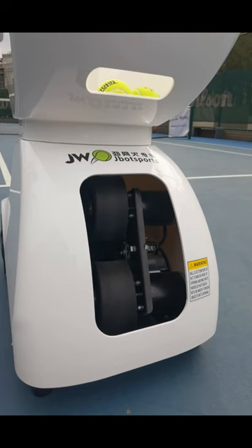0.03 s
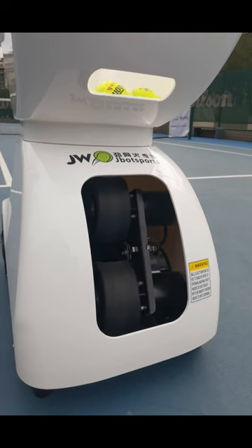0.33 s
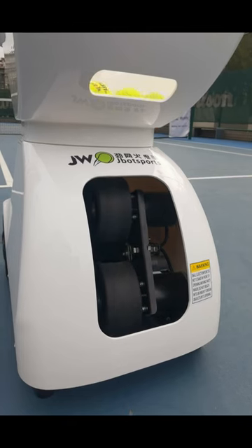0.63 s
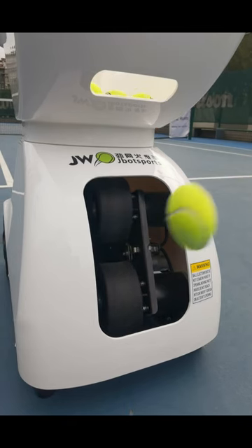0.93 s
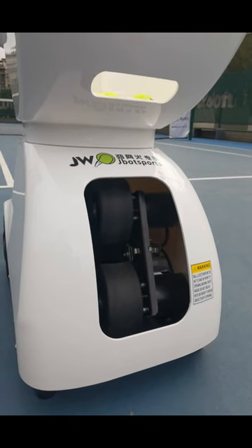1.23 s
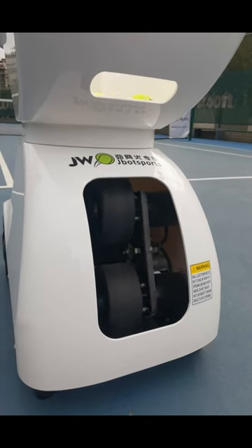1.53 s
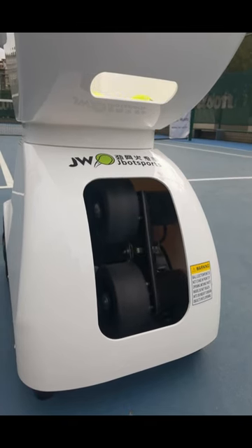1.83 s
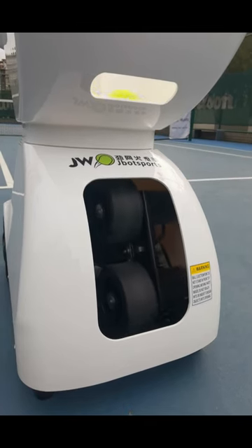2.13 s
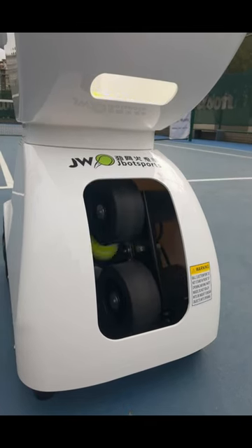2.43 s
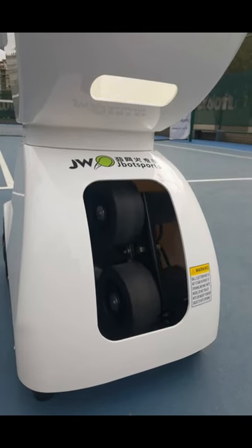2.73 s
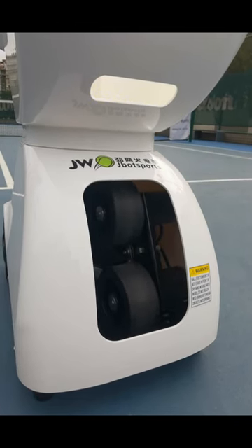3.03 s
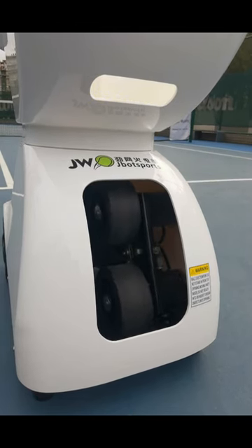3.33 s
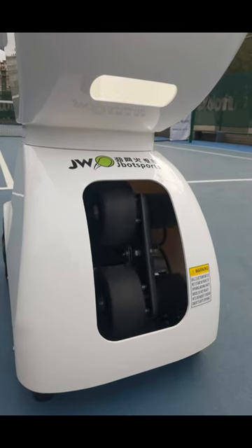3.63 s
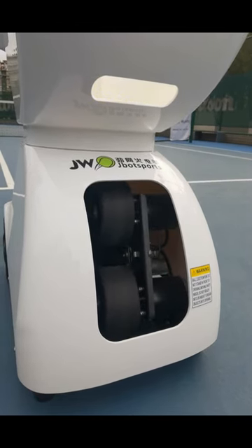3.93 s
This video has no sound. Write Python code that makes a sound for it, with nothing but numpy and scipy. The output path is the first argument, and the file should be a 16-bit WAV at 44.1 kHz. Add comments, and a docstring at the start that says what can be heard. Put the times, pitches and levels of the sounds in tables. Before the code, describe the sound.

A tennis ball machine's motor whines three times, each run ending with a clack.

```python
"""Tennis ball machine aiming

Outdoor court; the machine is close, a little to the right. A gear motor whines three times: already
running at first, then spinning up twice. Each time a coarser swivel drive joins in to turn the launch
head, and both stop with a clack. Twice a short rasp of the mechanism follows and runs down in a hum.
Hollow knocks sound in the plastic shell."""
import sys
import numpy as np
from scipy import signal
from scipy.fft import rfft, irfft, next_fast_len
from scipy.io import wavfile
from scipy.ndimage import map_coordinates

SR = 44100
rng = np.random.default_rng(int(sys.argv[2]) if len(sys.argv) > 2 else 0)


def unload_wav(signal):
    """Save mono or channel-first audio to the path in sys.argv[1] as 16-bit WAV at rate SR, clipped to [-1, 1]."""
    wavfile.write(
        sys.argv[1],
        SR,
        np.round(np.clip(np.atleast_2d(signal).T, -1, 1) * 32767).astype(np.int16),
    )


N = 176400

# Motor runs. Each row: start, end and rise in seconds, hiss in dB, sag in dB/s, opening whirr in dB,
# whine in Hz, whine in dB, whine fade in dB/s, reverse flag.
MOTOR_RUNS = [(0.037, .8, 0.01, -29, 19, -34.5, 1120, -36.5, 45, 0),
              (1.34, 2.356, 0.051, -33.5, 1, -38, 1117, -46.5, 3.5, 0),
              (2.933, 3.94, 0.06, -38, 2, -58, 1099, -54, 1, 1)]
# Each row: multiple of the whine, forward level in dB, reverse level in dB.
GEAR_LINES = [(1, -1.5, -1.5), (2, -2, -20), (2.385, -7.5, -6), (2.72, -30, -5), (3, -4, -14),
              (4, -13, -5.5), (5, -7.5, -18)]
# Each row: start and end in seconds, pitch in Hz, level in dB.
MOUNT_TONES = [(1.414, 1.513, 419.4, -47), (2.971, 3.147, 426, -49.5), (3.14, 3.331, 422.6, -54)]
# Each row: start in seconds, level in dB, T60 in seconds, pitch in Hz.
FRAME_THUDS = [(.047, -35.5, 0.085, 63.4), (0.439, -34, 0.21, 134.5), (0.511, -33, 0.27, 125.8),
               (.94, -28, 0.1, 90), (0.964, -29.5, 0.23, 70.3), (2.041, -35.5, 0.28, 129.8),
               (2.48, -26, 0.084, 122), (3.686, -34, 0.14, 105), (3.745, -28.5, 0.15, 74)]
# Each row: start and end in seconds, level in dB, sag in dB/s, hiss in dB, tooth rate in Hz.
SWIVEL_RUNS = [(0.176, 0.784, -27, 3, -37.5, 100.5), (1.761, 2.357, -32.5, 3.5, -41, 100.5),
               (3.336, 3.981, -33, -1, -42, 100.9)]
# Each row: start in seconds, level in dB, T60 in seconds.
GEAR_CATCHES = [(.349, -27, 0.097), (.44, -24.5, 0.027), (.702, -29.5, 0.069)]
SHELL_KNOCKS = [(.438, -18.5, 0.11), (.938, -32, 0.14), (2.036, -27, 0.25), (2.487, -25, 0.046),
                (3.686, -17, 0.088)]
FEEDER_TICKS = [(.593, -36, .09)]
STOP_CLACKS = [(.779, -17.5, 0.096), (.804, -26, 0.076), (2.348, -14, 0.08), (2.378, -27.5, 0.078),
               (3.686, -22, 0.043), (3.929, -13, 0.1), (3.987, -16, 0.096)]
# Each row: start and end in seconds, pitch in Hz, level in dB, T60 in seconds.
COASTS = [(0.784, 0.825, 279.5, -36.5, 0.13), (0.932, 0.986, 252.2, -27, 0.14),
          (1.01, 1.106, 274, -38, 0.13), (2.356, 2.416, 274.2, -37.5, 0.19),
          (2.468, 2.501, 267.6, -34, 0.079), (2.544, 2.597, 270, -30.5, 0.29),
          (3.937, 4.003, 285, -35, .15)]
# Each row: start, end and rise in seconds, treble in dB, body in dB, sag in dB/s.
RASP_BURSTS = [(0.915, 1.014, 0.044, -23, -25.5, -0.5), (2.455, 2.569, 0.042, -23, -27, 83.5)]
# Partials. Each row: multiple of the base frequency, level in dB.
TOOTH_PARTIALS = [(4.3, -10), (5, 3), (6.53, -3), (11, -3), (12, -3), (13, -2.5), (14, 3), (20.15, -0.5),
                  (22.7, 1)]
COAST_PARTIALS = [(1, -0.5), (1.34, -11.5), (1.67, -9), (1.98, -12.5), (2.41, -15.5)]
# Each row: frequency in Hz, level in dB.
SHELL_MODES = [(241, -0.5), (405, -5), (462, 1), (545, -4), (1100, -3.5), (1232, -1.5), (1395, -8.5)]
# Each row: frequency in Hz, width in Hz, level in dB.
METAL_MODES = [(7950, 220, -1), (10030, 150, 2), (12870, 830, -3.5), (15000, 150, -5.5)]
# Noise spectra. Each row: frequency in Hz, relative level in dB.
AIR_DB = [(15, -50), (25, -4.5), (76, -2), (276, -15.5), (955, -21.5), (2030, -33), (15800, -52.5)]
BRUSH_DB = [(70, -45), (135, -16), (220, -18), (370, -12), (450, -10.5), (702, -10.5), (1100, -6.5),
            (1500, -8), (1850, -10), (2450, -2.5), (3820, -8), (4400, -12.5), (5700, -8), (6700, -11.5),
            (8550, 1), (12800, -11.5), (15800, -2.5)]
WHIRR_DB = [(1500, -32), (2400, -5), (3900, -8.5), (5700, -6.5), (7300, -4), (8500, 1), (11000, -3.5),
            (15500, -35.5)]
THUD_DB = [(20, -12), (60, 5), (140, -2), (220, -12), (2000, -72)]
GRIND_DB = [(24, -30), (40, -8), (135, -1), (214, -14), (270, -4.5), (310, -18), (401, -3), (573, -6),
            (1350, -4.5), (1850, -8), (2290, -2), (3630, -13), (6000, -20.5), (9000, -61.5)]
SWIVEL_HISS_DB = [(5000, -32.5), (7000, 3.5), (9200, 12), (11000, 4), (13000, -1)]
CATCH_DB = [(300, -19.5), (1200, -10.5), (1700, -10.5), (2400, 3), (3500, -15.5), (15000, -43.5)]
KNOCK_DB = [(150, -7), (500, 0.5), (2400, -13.5), (6000, -36.5)]
CLACK_DB = [(88, -37.5), (150, -18), (430, 1), (1090, -2.5), (2080, -4.5), (3590, 2), (4800, -9),
            (7990, -3), (14100, -1.5), (15800, 3)]
COAST_RATTLE_DB = [(100, -10), (220, 2.5), (500, -5.5), (2000, -23), (6000, -76.5)]
RASP_TREBLE_DB = [(2350, -37.5), (4000, -11), (8210, -4), (12700, -2.5), (14300, -7), (15800, 0)]
RASP_BODY_DB = [(21, -25), (70, 4), (171, -11), (256, 7), (320, -10.5), (400, -2.5), (961, -6),
                (2710, -5.5), (4500, -15), (5850, -40), (9900, -120)]
# Stereo balance. Each row: frequency in Hz, left minus right in dB.
MOTOR_PAN_DB = [(100, -1.5), (500, 0.5), (800, 0), (1200, -6), (1900, -5.5), (2600, -11), (4500, 0),
                (7000, -1), (8500, -19.5), (10000, -24), (13000, -18), (15500, -15)]
SHELL_PAN_DB = [(100, -4), (500, 0), (1300, -7), (3000, -4.5)]
# Each row: frequency in Hz, left-right correlation.
COHERENCE = [(60, 0.53), (300, 0.38), (700, 0.082), (1300, 0), (3000, .05), (10000, 0.43)]

RATTLE_HZ, RATTLE_WIDTH_HZ = [1300, 2200, 2520, 2920], 56  # loose gears ringing
MOTOR_SLOWING_PER_S, COAST_SLOWING_PER_S = .011, .15  # fraction of pitch lost
TIME_S = np.arange(N) / SR


def amp(db):
    return np.exp(np.asarray(db) * (np.log(10) / 20))


def log_interp(points, hz):
    knots_hz, values = np.transpose(points)
    return np.interp(np.log(hz + 1), np.log(knots_hz + 1), values)


def wobble(knots_per_s):
    """Smooth random curve."""
    coarse_s = TIME_S[::16]
    curve = map_coordinates(rng.standard_normal(4096), [coarse_s * knots_per_s + 2], mode="wrap")
    return np.interp(TIME_S, coarse_s, curve)


def filtered(x, response):
    size = next_fast_len(N + SR // 4)
    return irfft(rfft(x, size) * response(np.fft.rfftfreq(size, 1 / SR)), size)[..., :N]


def resonances(modes, f):
    """Gain of power-summed resonators at f Hz."""
    gains = (amp(db) * f * width / (hz * hz - f * f + 1j * f * width) for hz, width, db in modes)
    return np.sqrt(sum(np.abs(gain) ** 2 for gain in gains))


def noise(colour, pan_db=MOTOR_PAN_DB):
    """Stereo noise, mid rms 1; colour is a spectrum table or a gain function."""
    def mid_side(f):
        angle = np.arccos(np.clip(log_interp(COHERENCE, f), -1, 1)) / 2
        return np.array([np.cos(angle), np.sin(angle)])

    def left_right(f):
        gains = amp(log_interp(pan_db, f) * np.array([[.5], [-.5]]))
        centre = np.sqrt((gains ** 2).sum(0) + 2 * np.clip(log_interp(COHERENCE, f), -.5, 1))
        return gains / centre * (colour(f) if callable(colour) else amp(log_interp(colour, f)))
    mid, side = filtered(rng.standard_normal((2, N)), mid_side)
    pair = filtered(np.array([mid + side, mid - side]), left_right)
    return pair / pair.mean(0).std()


def band_noise(hz, width_hz):
    return noise(lambda f: resonances([(hz, width_hz, 0)], f) ** 2)


def metal_noise(spectrum, ring_db):
    """Noise that also rings the metal parts."""
    return noise(lambda f: amp(log_interp(spectrum, f)) * (1 + amp(ring_db) * resonances(METAL_MODES, f)))


def tone(hz, blur_rad, wobble_hz, pan_db):
    """Panned sine, wandering in phase and level."""
    drift_rad = blur_rad * (wobble(wobble_hz) + 2 * wobble(wobble_hz / 4))
    phase_rad = 2 * np.pi * np.cumsum(hz * np.ones(N)) / SR + drift_rad
    gains = amp(pan_db * np.array([[.5], [-.5]]))
    flicker = amp(2 * wobble(wobble_hz))
    return np.sqrt(2) * np.sin(phase_rad) * flicker * gains / gains.mean()


def gate(start_s, end_s, rise_s, t60_s, sag_db_s=0):
    """Linear rise, sagging hold, exponential release."""
    first, last = max(int(start_s * SR), 0), max(int((max(start_s, end_s) + 2 * t60_s) * SR), 0)
    t = TIME_S[first:last]
    sag_db = sag_db_s * np.clip(t - start_s, 0, abs(end_s - start_s))
    release_db = 60 * np.maximum(t - end_s, 0) / t60_s
    level = np.zeros(N)
    level[first:last] = np.clip((t - start_s) / rise_s, 0, 1) * amp(-sag_db - release_db)
    return level


def blows(rows, rise_s):
    """Summed impact envelopes."""
    return sum(amp(db) * gate(at_s, at_s + rise_s, rise_s, t60_s) for at_s, db, t60_s in rows)


def chatter(ticks_per_s, t60_s):
    """Envelope of random, uneven ticks."""
    kicks = (rng.random(N) < ticks_per_s / SR) * np.sqrt(rng.exponential(size=N))
    return signal.lfilter([1], [1, -amp(-60 / (t60_s * SR))], kicks)


def housing(x, depth_db=3, spacing_hz=34.72):
    """Close, narrow resonances of the hollow housing."""
    knots = rng.standard_normal(4096)

    def response(f):
        ripple = map_coordinates(knots, [f / spacing_hz], mode="wrap")
        return amp(depth_db * np.clip(f / 2000, 0, 1) * ripple)
    return filtered(x, response)


def court_air():
    """Faint open-air rumble."""
    fade_in = np.clip(TIME_S / .031 - 1, 0, 1)
    return amp(-57.5) * noise(AIR_DB, SHELL_PAN_DB) * amp(1.7 * wobble(32)) * fade_in


def gear_motor(whirr_s=.188):
    """Brush hiss and a brief whirr flutter with the shaft; gear lines sink with speed; the mount hums."""
    hiss = whirr = whine = mount = 0
    whine_hz, reverse = np.full(N, 1000.), np.zeros(N)
    for start_s, end_s, rise_s, db, sag_db_s, whirr_db, hz, whine_db, fade_db_s, backwards in MOTOR_RUNS:
        onset = amp(-27) * gate(start_s - rise_s / 2, start_s, rise_s, .2)
        hiss += amp(db) * (onset + gate(start_s, end_s, rise_s, .05, sag_db_s))
        whirr += amp(whirr_db) * gate(start_s, start_s + whirr_s, rise_s, .14) ** 2
        whine += amp(whine_db) * gate(start_s + rise_s, end_s, rise_s, .12, fade_db_s)
        age_s = TIME_S - start_s
        whine_hz = np.where(age_s >= 0, hz * (1 - MOTOR_SLOWING_PER_S * age_s), whine_hz)
        reverse = np.where(age_s >= 0, backwards, reverse)
    shaft = np.sin(2 * np.pi * np.cumsum(whine_hz / 38) / SR)
    lines = sum(amp(np.where(reverse, reverse_db, db)) * tone(k * whine_hz, .36, 60, pan_db=-13.5)
                for k, db, reverse_db in GEAR_LINES)
    for start_s, end_s, hz, db in MOUNT_TONES:
        mount += amp(db) * gate(start_s, end_s, .016, .051) * tone(hz, .25, 70, pan_db=-15)
    flutter = amp(.847 * shaft + .52 * wobble(500) + 1.2 * wobble(30))
    rush = hiss * housing(noise(BRUSH_DB)) + whirr * housing(noise(WHIRR_DB))
    return rush * flutter + whine * lines + mount


def frame_thuds():
    """The frame swings after each jolt, over a dull rumble."""
    rumble = amp(-3.5) * noise(THUD_DB, SHELL_PAN_DB)
    thuds = 0
    for start_s, db, t60_s, hz in FRAME_THUDS:
        swing = np.sin(2 * np.pi * hz * (TIME_S - start_s))
        thuds += amp(db) * gate(start_s, start_s + .0034, .0079, t60_s) * (swing + rumble)
    return thuds


def swivel_drive():
    """Coarse teeth mesh: blurred partials, grind, loose-gear rattle and hiss."""
    load, hiss, tooth_hz = 0, 0, np.full(N, 100.)
    for start_s, end_s, db, sag_db_s, hiss_db, hz in SWIVEL_RUNS:
        running = gate(start_s, end_s, .016, .47, sag_db_s)
        load += amp(db) * running
        hiss += amp(hiss_db) * running
        tooth_hz[TIME_S >= start_s] = hz
    mesh = np.sin(2 * np.pi * np.cumsum(tooth_hz) / SR)
    lines = sum(amp(db) * tone(k * tooth_hz, .44, 70, pan_db=-13) for k, db in TOOTH_PARTIALS)
    grind = housing(noise(GRIND_DB)) * amp(1.2 * mesh + 1.5 * wobble(250) + 1.7 * wobble(35))
    ringing = noise(lambda f: resonances([(hz, RATTLE_WIDTH_HZ, 0) for hz in RATTLE_HZ], f))
    rattle = chatter(ticks_per_s=31, t60_s=.05) * ringing
    gears = amp(-12) * rattle + amp(-8) * grind + amp(-21) * lines
    return load * gears + hiss * noise(SWIVEL_HISS_DB) * amp(.9 * wobble(400))


def bearing_squeal():
    """A bearing squeals thinly during the first swivel."""
    return amp(-43.5) * gate(.22, .8, rise_s=.05, t60_s=.1) * band_noise(9190, width_hz=170)


def gear_catches():
    """The gears catch briefly."""
    return blows(GEAR_CATCHES, rise_s=.0038) * noise(CATCH_DB)


def shell_knocks():
    """Knocks ring the hollow plastic shell."""
    modes = sum(amp(db) * tone(hz, .48, 110, log_interp(SHELL_PAN_DB, hz)) for hz, db in SHELL_MODES)
    shell = amp(-8) * modes + amp(-5.5) * noise(KNOCK_DB, SHELL_PAN_DB)
    return blows(SHELL_KNOCKS, rise_s=.0032) * shell


def feeder_tick():
    """One light tick in the feeder."""
    return blows(FEEDER_TICKS, rise_s=.0037) * band_noise(4330, width_hz=440)


def stop_clacks():
    """Gears rattle briefly against their end of play."""
    return blows(STOP_CLACKS, rise_s=.00099) * metal_noise(CLACK_DB, ring_db=-.5) * amp(wobble(600))


def coasting_hum():
    """The drives coast to rest: a sinking hum over a soft rattle."""
    level, hum_hz = 0, np.full(N, 280.)
    for start_s, end_s, hz, db, t60_s in COASTS:
        level += amp(db) * gate(start_s, end_s, .0069, t60_s)
        age_s = TIME_S - start_s
        hum_hz = np.where(age_s >= 0, hz * (1 - COAST_SLOWING_PER_S * age_s), hum_hz)
    hum = sum(amp(db) * tone(k * hum_hz, .2, 50, pan_db=-8) for k, db in COAST_PARTIALS)
    return level * (amp(-5) * hum + amp(-8.5) * noise(COAST_RATTLE_DB))


def rasp_bursts():
    """The mechanism rasps: rough metallic treble over a lower rumble."""
    treble = body = 0
    for start_s, end_s, rise_s, treble_db, body_db, sag_db_s in RASP_BURSTS:
        treble += amp(treble_db) * gate(start_s, end_s, rise_s, .11, sag_db_s)
        body += amp(body_db) * gate(start_s, end_s - .03, rise_s, .22, sag_db_s)
    rasp = treble * metal_noise(RASP_TREBLE_DB, ring_db=6) + body * noise(RASP_BODY_DB)
    return rasp * amp(1.2 * wobble(300) + 1.1 * wobble(60))


def restart_growl(start_s=1.35, end_s=1.5):
    """Gritty gear noise climbs as the motor gathers speed."""
    low, high = band_noise(2440, width_hz=630), band_noise(3100, width_hz=630)
    speed = np.clip((TIME_S - start_s) / (end_s - start_s), 0, 1)
    level = amp(-41 + 2 * wobble(300)) * gate(start_s, end_s, rise_s=.035, t60_s=.1)
    return level * (np.sqrt(1 - speed) * low + np.sqrt(speed) * high)


def scene():
    drives = gear_motor() + restart_growl() + swivel_drive() + bearing_squeal()
    stops = stop_clacks() + rasp_bursts() + coasting_hum()
    impacts = frame_thuds() + gear_catches() + shell_knocks() + feeder_tick()
    return court_air() + drives + stops + impacts


def record(dry):
    """Soft peak limit, then a steep low-pass."""
    ceiling, cutoff_hz = .68, 15950
    rounded = dry / (1 + (dry / ceiling) ** 4) ** .25
    return filtered(rounded, lambda hz: 1 / (1 + (hz / cutoff_hz) ** 160))


dry = scene()
out = record(dry)
unload_wav(out)
```